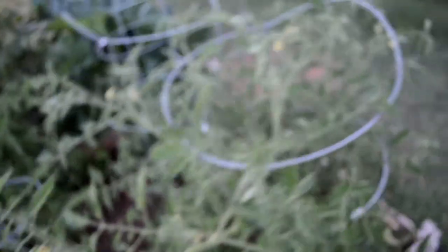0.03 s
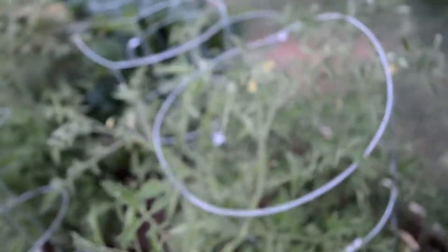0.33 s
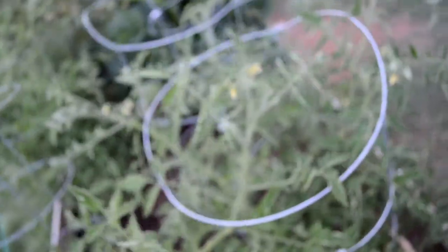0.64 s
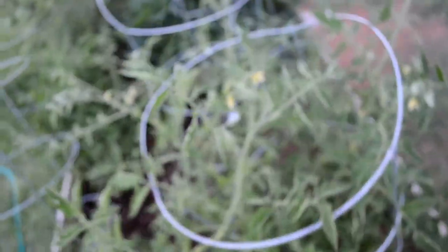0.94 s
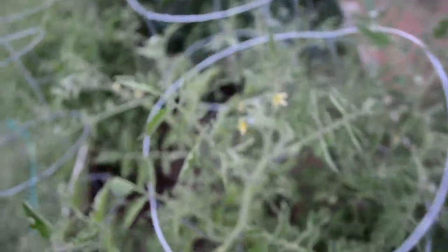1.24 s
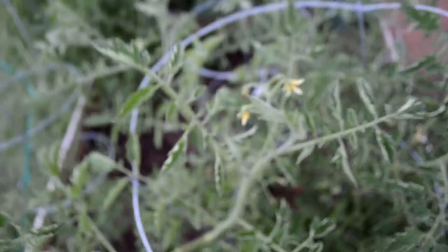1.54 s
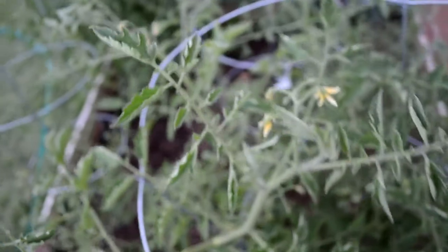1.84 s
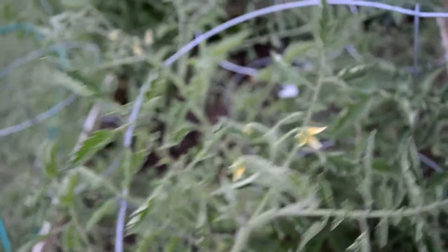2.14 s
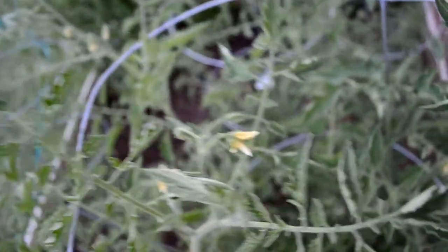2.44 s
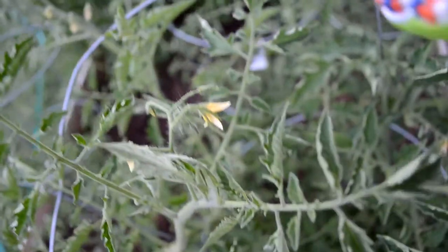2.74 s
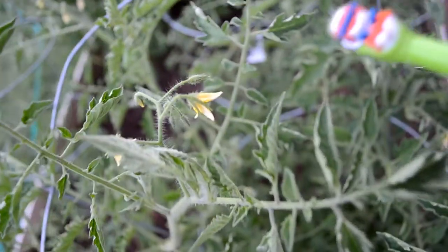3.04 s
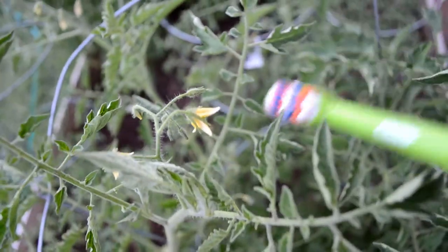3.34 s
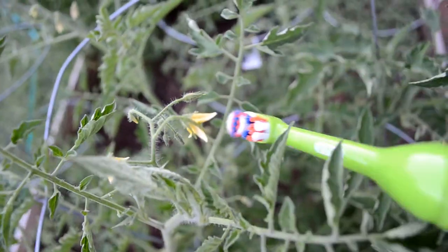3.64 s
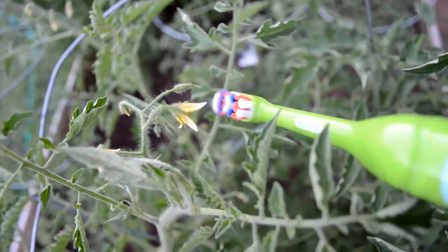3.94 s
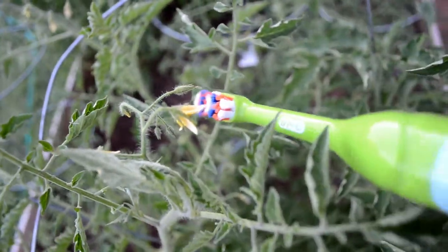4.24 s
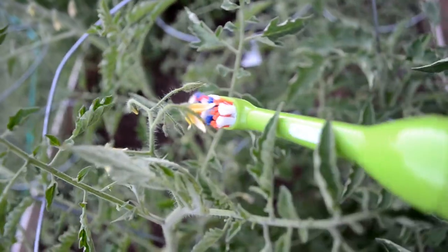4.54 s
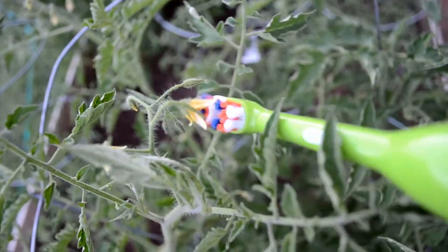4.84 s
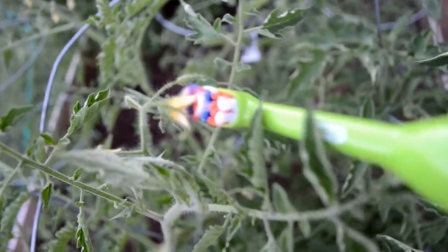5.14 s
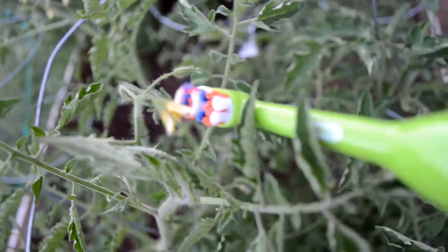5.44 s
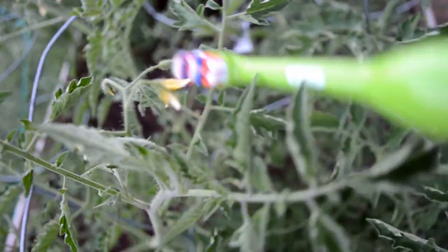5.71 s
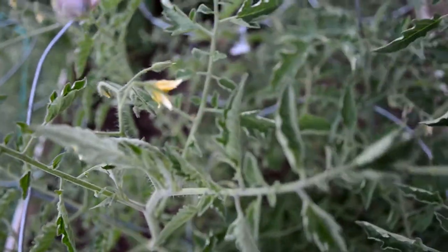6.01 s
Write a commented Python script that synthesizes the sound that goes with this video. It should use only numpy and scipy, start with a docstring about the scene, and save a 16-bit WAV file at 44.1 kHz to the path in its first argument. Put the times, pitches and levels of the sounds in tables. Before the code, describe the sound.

Faint outdoor rumble, then a sharp click starts an electric toothbrush whose steady buzz grows louder near the end.

```python
"""An electric toothbrush is clicked on in a quiet garden, held to a tomato flower and lifted towards
the microphone. Its motor spins up to 100 turns a second, and each turn knocks the drive against the
plastic handle and neck: a periodic impact excites their resonances, giving a buzz rich in harmonics.
Behind it are distant rumble and hum, thin high tones, a far bird, rustling leaves and a soft bump.
Puffs of air buffet the microphone."""
import sys
import numpy as np
from scipy import signal
from scipy.fft import rfft, irfft, next_fast_len
from scipy.io import wavfile
from scipy.ndimage import map_coordinates

SR = 44100
rng = np.random.default_rng(int(sys.argv[2]) if len(sys.argv) > 2 else 0)


def wav_out(sig):
    """Save sig, one row per channel (or a flat mono array), as 16-bit PCM at SR to the path in sys.argv[1]."""
    wavfile.write(sys.argv[1], SR, np.round(np.clip(np.atleast_2d(sig).T, -1, 1) * 32767).astype(np.int16))


N = 276507
TIME = np.arange(N) / SR


def amp(db):
    """Decibels to amplitude ratio."""
    return 10 ** (np.asarray(db) / 20)

def unit(x):
    """Normalisation to rms 1."""
    return x / np.sqrt(np.mean(x ** 2) + 1e-20)

def gain_at(spectrum, hz):
    """Amplitude between (Hz, dB) points, interpolated on a logarithmic frequency axis."""
    points_hz, db = np.transpose(spectrum)
    return amp(np.interp(np.log(hz + 1), np.log(points_hz + 1), db))

def wobble(rate):
    """Smooth random modulation through rate knots a second."""
    return map_coordinates(rng.standard_normal(int(N * rate / SR) + 4), [TIME * rate])

def swells(rows):
    """Gaussian envelopes from rows of centre in seconds, half width in seconds and level in dB."""
    return sum(amp(db) * np.exp(-.5 * ((TIME - s) / half) ** 2) for s, half, db in rows)

def held(start, end, edge):
    """Trapezoidal envelope: rises from start and falls from end, each over edge seconds."""
    return np.clip((TIME - start) / edge, 0, 1) - np.clip((TIME - end) / edge, 0, 1)

def filtered(x, response):
    """Linear filtering: the spectrum of x times a frequency response."""
    size = next_fast_len(N + SR // 2)
    return irfft(rfft(x, size) * response(np.fft.rfftfreq(size, 1 / SR)), size)[:N]

def noise(spectrum):
    """White noise shaped by (Hz, dB) points, at rms 1."""
    return unit(filtered(rng.standard_normal(N), lambda hz: gain_at(spectrum, hz)))

def pulses(times, heights, reach=8):
    """Band-limited impulses: a windowed sinc places each between samples."""
    at = np.asarray(times)[:, None] * SR
    taps = np.floor(at).astype(int) + np.arange(1 - reach, reach + 1)
    shape = np.sinc(taps - at) * np.cos(np.pi * (taps - at) / (2 * reach)) ** 2
    weights = np.asarray(heights)[:, None] * shape
    return np.bincount(np.clip(taps, 0, N).ravel(), weights.ravel(), N + 1)[:N]

def through(x, spectrum, size=8192):
    """Convolution with the minimum-phase impulse response, peak 1, of a body with this spectrum."""
    cepstrum = irfft(np.log(gain_at(spectrum, np.fft.rfftfreq(size, 1 / SR))))
    cepstrum[1:size // 2] *= 2
    cepstrum[size // 2 + 1:] = 0
    response = irfft(np.exp(rfft(cepstrum)))[:size // 2]
    return signal.oaconvolve(x, response / np.abs(response).max())[:N]

def rebounding(x, delay_s, direct):
    """All-pass reflection: repeated echoes spread a blow in time and keep its colour."""
    late = lambda hz: np.exp(-2j * np.pi * hz * delay_s)
    return filtered(x, lambda hz: (direct + late(hz)) / (1 + direct * late(hz)))

def decays(impulses, life_s):
    """Damping: an envelope that jumps at each impulse and falls exponentially."""
    fade = np.exp(-np.arange(SR // 50) / SR / life_s)
    return signal.oaconvolve(impulses, fade / np.linalg.norm(fade))[:N]

def delayed(x, lag_s):
    """Propagation delay, which may vary in time."""
    return map_coordinates(x, [(TIME - lag_s) * SR])


# Outdoor noise. Each row: frequency in Hz, relative spectral density in dB.
RUMBLE_SPECTRUM = [(15, -30), (30, -5), (55, -3), (120, -5.5), (170, -7), (260, -12), (500, -13.5),
                   (800, -12), (1030, -10), (1280, -14.5), (1900, -19), (2700, -27), (3700, -30.5),
                   (4800, -39), (7000, -45.5), (15800, -54)]
def rumble():
    """Distant broadband noise, strongest in the bass, under slight amplitude modulation."""
    return amp(-52.5 + 0.7 * wobble(3.65)) * noise(RUMBLE_SPECTRUM)

# Partials of a distant machine. Each row: frequency in Hz, relative level in dB.
HUM_PARTIALS = [(48.4, -54.5), (75.4, -60.5), (118.4, -60.5), (236.9, -65), (414.5, -64), (710.6, -73),
                (888.2, -68.5), (1066, -64)]
def machine_hum(gain_db=-4):
    """Superposition of sinusoids, each wavering in amplitude and phase."""
    hum = 0
    for hz, db in HUM_PARTIALS:
        peak = np.sqrt(2) * amp(db + gain_db + 1.1 * wobble(8.1))
        hum += peak * np.sin(2 * np.pi * hz * TIME + 0.68 * wobble(5))
    return hum

# Insect-like tones. Each row: frequency in Hz, nominal bandwidth in Hz, level in dB.
SHRILL_BANDS = [(3060, 55, -74.5), (3496, 52, -76.5), (5370, 78, -86.5)]
def shrill_tones():
    """Fast random modulation broadens each tone into a narrow band."""
    tones = 0
    for hz, width, db in SHRILL_BANDS:
        flutter = amp(3.2 * wobble(width))
        phase = 2 * np.pi * hz * TIME + 2 * wobble(3 * width)
        tones += amp(db) * unit(flutter * np.sin(phase))
    return tones

# Bird calls. Each row: centre in seconds, half width in seconds, level in dB.
BIRD_CALLS = [(.2, 0.036, -67.5), (.98, 0.069, -69), (1.46, 0.012, -60.5), (1.92, 0.06, -71)]
def far_bird():
    """Band-limited noise, peaking near 3.9 kHz, swells into short calls."""
    return swells(BIRD_CALLS) * noise([(1500, -48), (2100, -12), (2700, -20), (3400, -2),
                                       (3900, 3), (4300, -9), (5000, -27), (8000, -70)])

# Rustles. Each row: centre in seconds, half width in seconds, level in dB.
LEAF_RUSTLES = [(.39, 0.019, -78), (1.04, 0.055, -67), (1.335, .03, -65), (1.85, 0.11, -69)]
def leaves():
    """Friction between brushing leaves gives brief swells of broadband noise."""
    return swells(LEAF_RUSTLES) * noise([(200, -7), (2000, 13.5), (6000, -5), (13000, -12), (16000, -13)])

def bump():
    """A Gaussian burst of noise near 200 Hz, heard as one soft bump."""
    thud = noise([(40, -16), (110, 1), (200, 9.5), (260, -1), (340, -8.5), (900, -11), (3000, -59)])
    return swells([(.39, 0.07, -48.5)]) * thud


# The switch closing. Its one row: time in seconds, gain in dB.
SWITCH_CLICK = [(2.968, -14.5)]
ON_S, CLICK_DB = SWITCH_CLICK[0]
# Its snap. Each row: frequency in Hz, relative spectral density in dB.
SNAP_SPECTRUM = [(300, -28), (900, -17), (1450, -1), (1950, -2), (2700, -12), (4800, -20), (9000, -17.5),
                 (12000, -23), (14500, -25), (16000, -33)]
def switch(rattle_db=-27, rattle_t60=0.07):
    """Impact on heavily damped plastic: one dead snap, then a short bright rattle."""
    age = np.maximum(TIME - ON_S, 0)
    decay = (age > 0) * amp(rattle_db - 60 * age / rattle_t60)
    rattle = decay * noise([(400, -15), (1500, 11), (4000, -1), (11000, -2), (16000, -19)])
    snap = rebounding(through(pulses([ON_S], [1]), SNAP_SPECTRUM), delay_s=0.00035, direct=0.42)
    return amp(CLICK_DB) * (snap + rattle)

SPIN_UP_S, SEAT_S = .05, .14  # time constants: the motor gains speed, the loose drive settles
def settling(life_s):
    """Exponential relaxation from 1, beginning when the switch closes."""
    return np.exp(-np.maximum(TIME - ON_S, 0) / life_s)

# Running speed, which sags and recovers with the load. Each row: time in seconds, turns a second.
MOTOR_SPEED = [(3.3, 99.51), (3.6, 99.77), (4.22, 99.67), (4.4, 99.9), (4.56, 99.72), (4.76, 100.04),
               (5.3, 99.54), (5.6, 99.64), (6.15, 99.98)]
def motor(waver=0.00077):
    """Rotation is the integral of speed: turns made as the motor spins up and wavers."""
    running = np.interp(TIME, *np.transpose(MOTOR_SPEED))
    speed = running * (1 - settling(SPIN_UP_S)) * (1 + waver * wobble(22))
    return np.cumsum(speed) / SR

def knocks(turns, phase, jitter_s, scatter_db):
    """Periodic impact: one impulse a turn, offset by phase turns, less regular at first."""
    count = np.arange(int(turns[-1]))
    times = np.interp(count + .76 + phase, turns, TIME, right=2 * TIME[-1])
    unevenness = 1 + 3 * np.exp(-count / 12)
    chance = rng.standard_normal((len(times), 2)) * unevenness[:, None]
    return pulses(times + jitter_s * chance[:, 0], amp(scatter_db * chance[:, 1]))

# Path of the brush. Each row: time in seconds, distance from the microphone in metres.
BRUSH_PATH = [(3.15, 0.36), (3.45, 0.33), (3.8, 0.32), (4.1, .29), (5.0, 0.28), (5.25, 0.3), (5.8, 0.3),
              (6.0, 0.2), (6.2, 0.19)]
def nearness(reference_m):
    """Inverse distance of the brush, 1 at the reference distance."""
    return reference_m / np.interp(TIME, *np.transpose(BRUSH_PATH))

def loudness(db, speed_power, near_power, flower_m=.3):
    """Power laws: amplitude grows with motor speed and with nearness."""
    return amp(db) * (1 - settling(SPIN_UP_S)) ** speed_power * nearness(flower_m) ** near_power

def touch(firmness=0.74):
    """Contact of the bristles with the flower, eased on and off; 0 is free."""
    return firmness * held(start=4.41, end=5.73, edge=0.14)

def posed(drive, spectra, low_hz, high_hz):
    """Source and filter: free, touching and lifted colours, matched in this band, crossfade."""
    lifted = np.clip(nearness(reference_m=.2) ** 3.6, 0, 1)
    shares = [(1 - lifted) * (1 - touch()), (1 - lifted) * touch(), lifted]
    sound = 0
    for share, spectrum in zip(shares, spectra):
        voice = through(drive, spectrum)
        band = filtered(voice, lambda hz: (hz > low_hz) & (hz < high_hz))
        sound += share * voice / np.std(band[TIME > ON_S])
    return sound

def shell_spectrum(harmonics):
    """Radiation efficiency: a small shell radiates little bass; the neck takes over near 3 kHz."""
    running_hz = np.median(np.transpose(MOTOR_SPEED)[1])
    points = [(k * running_hz, db - 16 * (k < 3) - 5 * (3 < k < 9)) for k, db in harmonics]
    return points + [(3000, -28.5), (4000, -36), (16000, -48.5)]

# Ring of the handle in each pose. Each row: harmonic of the motor speed, relative level in dB.
HANDLE_FREE = [(1, -23.5), (2, -33.5), (3, -13.5), (4, -12.5), (5, -18), (6, -21), (7, -34), (8, -40),
               (9, -18.5), (10, -3.5), (11, 4.5), (12, -11), (13, -1.5), (14, -5.5), (15, -11), (16, -6.5),
               (17, -12), (18, -7.5), (19, -4.5), (20, -9), (21, 0), (22, -15.5), (23, -5), (24, -3),
               (25, 0), (26, 0.5), (27, -3.5), (28, -10.5)]
HANDLE_TOUCHING = [(1, 1.5), (2, -46), (3, -16), (4, -11.5), (5, -28), (6, -20), (7, -37), (8, -62),
                   (9, -15), (10, -8), (11, 0.5), (12, -11.5), (13, -11.5), (14, -6.5), (15, -18.5),
                   (16, -3.5), (17, -45), (18, -5.5), (19, -8.5), (20, -10), (21, -4), (22, -12), (23, -23),
                   (24, -2.5), (25, 1), (26, -51.5), (27, -2), (28, -21)]
HANDLE_LIFTED = [(1, -3), (2, -23.5), (3, -11), (4, -17), (5, -24), (6, -37), (7, -21), (8, -19), (9, -56),
                 (10, -15), (11, -0.5), (12, -7), (13, -12), (14, -12), (15, -17), (16, -7.5), (17, -16.5),
                 (18, -3), (19, -5), (20, -1), (21, -2.5), (22, -5.5), (23, 3), (24, -9), (25, -3),
                 (26, -27), (27, -2), (28, -11.5)]
# Rattle of the loose head. Each row: frequency in Hz, relative spectral density in dB.
HEAD_RATTLE = [(600, -42), (1100, -4.5), (1500, -3.5), (2000, 0), (2600, 4), (2950, -12), (3600, 3),
               (4150, -13), (8000, -16), (16000, -45)]
def handle(turns):
    """Forced vibration: each turn's blow rings the handle and rattles the head."""
    blows = knocks(turns, phase=0.05, jitter_s=2e-6, scatter_db=0.35)
    drive = rebounding(blows, delay_s=.0014, direct=.75)  # along the neck
    drive = rebounding(drive, delay_s=.0049, direct=.92)  # half a turn later
    spectra = [shell_spectrum(pose) for pose in (HANDLE_FREE, HANDLE_TOUCHING, HANDLE_LIFTED)]
    ring = posed(drive, spectra, low_hz=950, high_hz=4000)
    # the head rattles unevenly, and more while the drive is slack or the bristles work on the flower
    looseness_db = 5 * settling(SEAT_S) + 4 * touch() + 1.2 * wobble(7)
    rattle = unit(decays(blows, life_s=.0025) * noise(HEAD_RATTLE)) * amp(-20 + looseness_db)
    return loudness(db=-37, speed_power=7, near_power=0.87) * (ring + rattle)

# Swings of the brush that catch a near reflection. Each row: centre in seconds, half width in
# seconds, longest delay in seconds, level against the direct sound in dB.
BRUSH_SWINGS = [(3.1, .3, .00041, -6), (5.92, .13, .000365, -5)]
def near_reflection(x, rest_lag_s=.00027):
    """Comb filtering: each swing stretches an echo's path, so notches glide through the treble."""
    lag, strength = rest_lag_s, 0
    for s, half, longest, db in BRUSH_SWINGS:
        bell = swells([(s, half, 0)])
        lag += (longest - rest_lag_s) * bell
        strength += amp(db) * np.sqrt(bell)
    return (x + strength * delayed(x, lag)) / np.hypot(1, strength)

# Tick of the drive in each pose. Each row: frequency in Hz, relative spectral density in dB.
NECK_FREE = [(2200, -41), (2850, 9), (3200, 4.5), (3700, 16), (3950, 6.5), (4150, 1.5), (4650, 0.5),
             (5100, -4.5), (6150, 3.5), (6750, -6), (7200, 5.5), (8000, -3), (9000, -2.5), (9500, -9),
             (11000, -13), (13600, -15), (15800, -65)]
NECK_TOUCHING = [(2200, -31), (2850, 11), (3150, 2.5), (3500, 15.5), (3850, 9), (4200, -15), (4700, -16.5),
                 (5350, 8), (6200, 5), (6750, 8), (7200, 6.5), (7850, -11), (8200, 6), (9000, -1.5),
                 (9800, -19), (10800, -13), (13200, -13), (13900, -5), (14700, -38)]
NECK_LIFTED = [(2200, -12), (2850, -8), (3500, 6.5), (4100, 3.5), (4500, -1.5), (5250, 7), (6200, -3.5),
               (7200, -1), (8300, -3), (10000, -18), (10800, -12.5), (11700, -26), (12900, -5),
               (14000, -27), (15800, -32)]
# Echoes inside the neck. Each row: delay in seconds, share of amplitude reflected at once.
NECK_ECHOES = [(.00013, .6), (.0004, .88), (.0015, .92)]
# Colour of the ticks while the drive is slack. Each row: frequency in Hz, gain in dB.
SLACK_COLOUR = [(2500, -8), (3200, -5), (4200, 3), (4800, -1), (5500, 8), (6500, -3), (7400, -2),
                (9000, -8)]
def neck(turns, return_db=-7.5, return_top_hz=6800):
    """Backlash: the loose drive ticks going out and more softly on return; each contact scrapes."""
    slack = settling(SEAT_S)  # until the drive has settled it scrapes more and rasps lower down
    outward = knocks(turns, phase=0, jitter_s=1.5e-6, scatter_db=.2)
    back = knocks(turns, phase=-.48, jitter_s=4e-6, scatter_db=.4)
    ticks = outward + amp(return_db) * filtered(back, lambda hz: 1 / (1 + (hz / return_top_hz) ** 8))
    scrape = decays(ticks, life_s=.0016) * noise([(3000, 0.5), (8000, 4), (12000, 4)])
    for delay_s, direct in NECK_ECHOES:
        ticks = rebounding(ticks, delay_s, direct)
    drive = ticks + amp(-21 + 9 * slack) * scrape
    seated = posed(drive, [NECK_FREE, NECK_TOUCHING, NECK_LIFTED], low_hz=3800, high_hz=12000)
    rasp = filtered(seated, lambda hz: gain_at(SLACK_COLOUR, hz))
    ticking = near_reflection(slack * rasp + (1 - slack) * seated)
    return loudness(db=-51, speed_power=0.78, near_power=2.07) * ticking

def toothbrush(sway_s=.0001):
    """Interference: the buzz meets its echoes off ground and hand, which shift as the hand sways."""
    turns = motor()
    buzz = handle(turns) + neck(turns)
    ground = amp(-18) * delayed(buzz, .0034 + sway_s * wobble(3.5))
    hand = amp(-19) * delayed(buzz, .001846 + sway_s * wobble(5.3))
    return buzz + ground + hand


# Gusts. Each row: start in seconds, length in seconds, level in dB.
WIND_GUSTS = [(4.222, 0.36, -47), (4.827, 0.062, -36.5), (4.926, 0.057, -33), (5.132, .18, -43),
              (5.38, 0.258, -48.5), (5.799, 0.088, -39.5), (5.952, 0.38, -45.5)]
# Sharp puffs. Each row: start in seconds, peak level in dB.
AIR_PUFFS = [(4.853, -39), (4.88, -50), (4.942, -25), (4.969, -35), (6.131, -20.5)]
# Colour of both. Each row: frequency in Hz, relative spectral density in dB.
WIND_SPECTRUM = [(20, -15), (50, -4), (75, -1.5), (125, -3.5), (190, -15.5), (300, -26), (600, -63),
                 (2000, -100)]
def breeze():
    """Turbulence: gusts and puffs buffet the microphone with low-frequency pressure changes."""
    gusts = sum(amp(db) * held(s, s + length, edge=0.021) for s, length, db in WIND_GUSTS)
    flow = gusts * amp(0.5 * wobble(25)) * noise(WIND_SPECTRUM)
    puff_s, puff_db = np.transpose(AIR_PUFFS)
    return flow + through(pulses(puff_s, amp(puff_db)), WIND_SPECTRUM)

def scene():
    """Superposition: all sources add at one microphone."""
    brush = switch() + toothbrush()
    garden = rumble() + machine_hum() + shrill_tones() + far_bird() + leaves() + bump()
    return (brush + garden + breeze())[None]

def record(dry, start_db=-24.5, fade_s=0.16, top_hz=15900):
    """Gain and band limiting: the sound fades in, and a low-pass filter removes the highest treble."""
    fade = amp(start_db * np.exp(-(TIME / fade_s) ** 2))
    return filtered(dry[0] * fade, lambda hz: hz < top_hz)[None]


dry = scene()
out = record(dry)
wav_out(out)
```